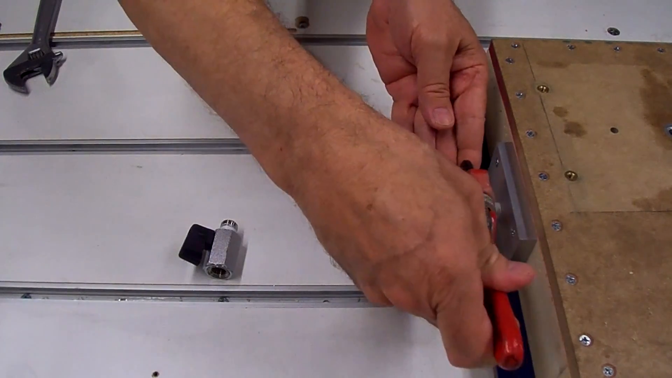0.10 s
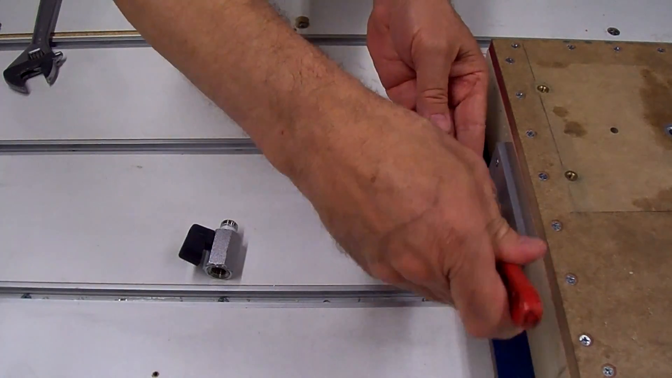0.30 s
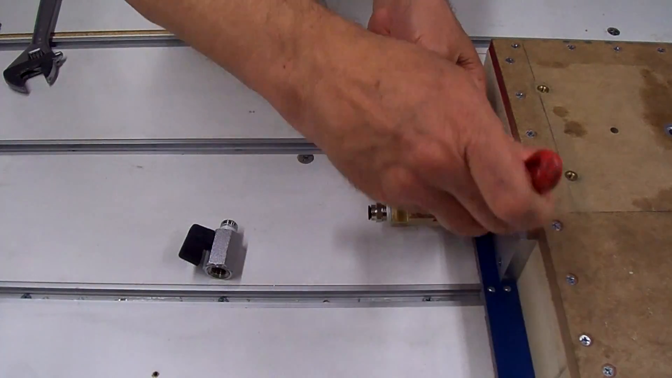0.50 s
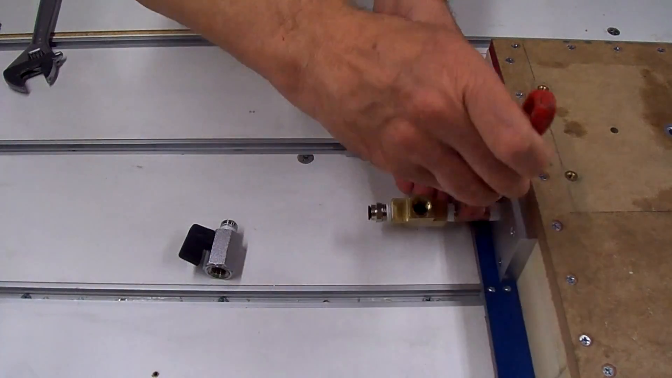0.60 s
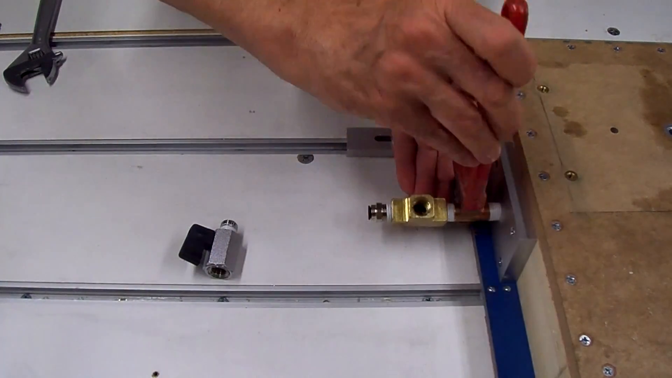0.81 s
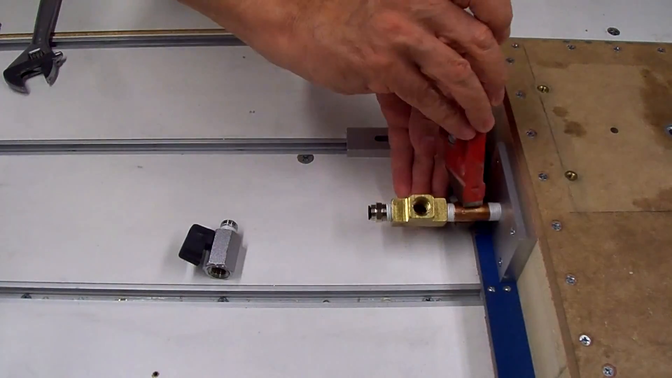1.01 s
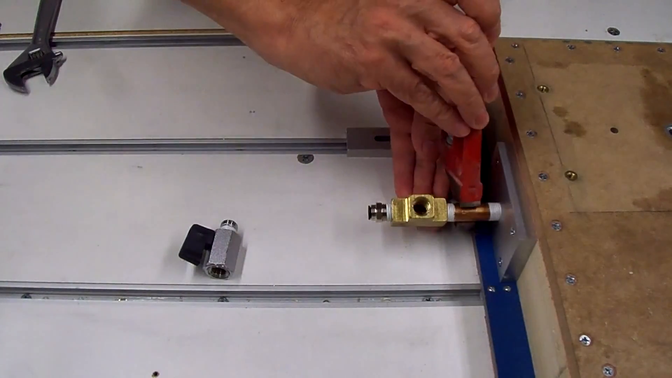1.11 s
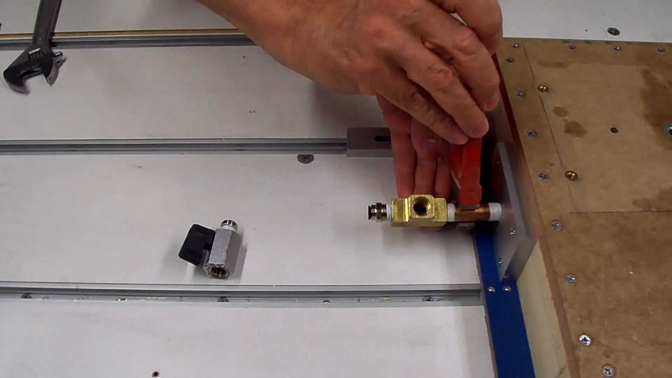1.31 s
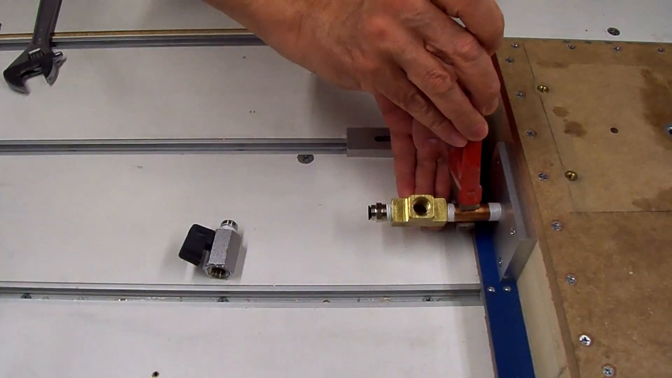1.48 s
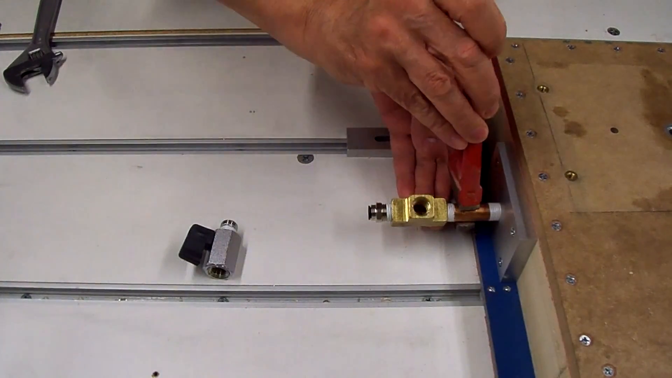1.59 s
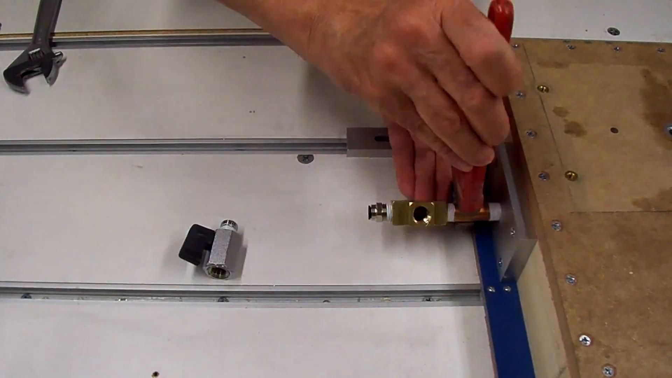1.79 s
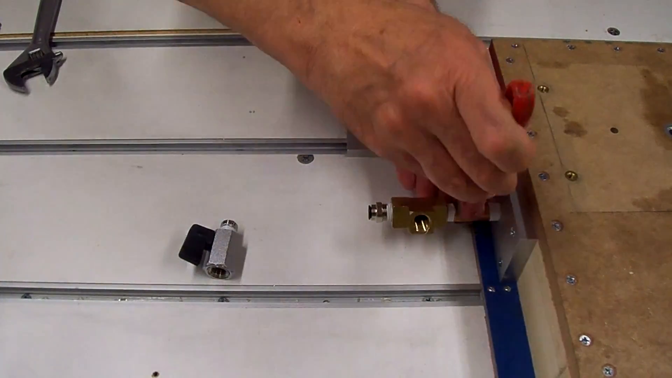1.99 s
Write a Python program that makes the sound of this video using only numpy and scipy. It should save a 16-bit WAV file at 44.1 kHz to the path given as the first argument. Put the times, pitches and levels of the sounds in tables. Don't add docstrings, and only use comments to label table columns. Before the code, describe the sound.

Close up in a quiet room, a hand wrench knocks brass parts with dry, short clinks and woody thuds, shifts softly, clatters again past the middle, then stops, leaving low rumble and hiss.

```python
import sys
import numpy as np
from scipy import signal
from scipy.fft import rfft, irfft, next_fast_len
from scipy.io import wavfile
from scipy.ndimage import map_coordinates

SR = 44100
rng = np.random.default_rng(int(sys.argv[2]) if len(sys.argv) > 2 else 0)


def boost(x):
    u = np.asarray(x, float) / 20
    return 10 ** u


def unload_wav(signal):
    wavfile.write(
        sys.argv[1],
        SR,
        np.round(np.clip(np.atleast_2d(signal).T, -1, 1) * 32767).astype(np.int16),
    )


N = 88200

# (frequency [Hz], level [dB], decay time t60 [s])
STEEL = [(1180, 0, .02), (1430, -2, .05), (1650, 0, .03), (2000, 0, .035), (2190, -2, .03), (2400, 0, .03),
         (2620, 1, .03), (2900, -4, .02), (3230, 0, .025), (3400, -2, .02), (3560, -2, .025),
         (3730, -1, .03), (4040, -2, .03)]
# (frequency [Hz], level [dB], decay time t60 [s])
BOARD = [(119, -12, .15), (167, 2, .33), (213, -6, .15), (244, -4, .14), (282, -5, .12), (327, -1, .12),
         (399, -3, .16), (522, -8, .1), (650, -6, .1), (730, -3, .06), (766, -2, .09), (925, -5, .09),
         (1008, -6, .09), (1093, -7, .07)]
STEEL_LONGEST_S, BOARD_LONGEST_S = .08, .34
STEEL_SCRAPE_DB = 1


def unit(x):
    return x / np.sqrt(np.mean(x ** 2) + 1e-20)


def along(points, hz):
    f, v = np.transpose(points)
    return np.interp(np.log(hz + 1), np.log(f + 1), v)


def filtered(x, response):
    m = next_fast_len(len(x) + 8192)
    hz = np.fft.rfftfreq(m, 1 / SR)
    return irfft(rfft(x, m) * response(hz), m)[:len(x)]


def near(hz, focus_hz, octaves):
    distance = np.log2((hz + 1) / focus_hz)
    return np.exp(-.5 * (distance / octaves) ** 2)


def ringing(modes, focus_hz, octaves, trim_db, longest_s, share=1):
    hz, db, t60 = np.transpose(modes)[:, :, None]
    t = np.arange(round(longest_s * SR)) / SR
    sign = (-1) ** np.arange(len(modes))[:, None]
    fall_db = 60 * t / (share * np.minimum(t60, longest_s))
    level = near(hz, focus_hz, octaves) * boost(db + trim_db[:, None] - fall_db)
    return np.sum(sign * level * np.sin(2 * np.pi * hz * t), axis=0)


def strikes(rows, modes, scrape_db, longest_s, rise_s=.0003, first_blow=1.5):
    scatter_db, dead_share, blow_s = 1.5, .18, .0006
    out = np.zeros(N + SR)
    t = np.arange(4096) / SR
    count = len(modes)
    luck = rng.standard_normal((len(rows), len(t) + count))
    waves = np.exp(2j * np.pi * np.transpose(modes)[0][:, None] * t)
    for (s, db, length, focus_hz, octaves), row in zip(rows, luck):
        envelope = np.exp(-t / length) + first_blow * np.exp(-t / blow_s)
        force = row[count:] * envelope * (1 - np.exp(-t / rise_s))
        trim_db = scatter_db * row[:count]
        drive = np.abs(waves @ force) / np.linalg.norm(force)
        even_db = -20 * np.log10(drive + .3)
        free = ringing(modes, focus_hz, octaves, trim_db + even_db, longest_s)
        gripped = ringing(modes, focus_hz, octaves, trim_db + even_db / 2, longest_s, dead_share)
        rung = signal.fftconvolve(force, free)
        dead = signal.fftconvolve(force, gripped)
        contact = rung / np.abs(rung).max() + boost(scrape_db) * dead / np.abs(dead).max()
        out[round(s * SR):][:len(rung)] += boost(db + 6) * contact
    return out[:N]


def air():
    # (frequency [Hz], level per Hz [dB])
    spectrum = [(12, -28), (20, 1.5), (125, -4.5), (160, -11.5), (194, -7.5), (234, -9.5), (518, -13),
                (611, -17.5), (13800, -32)]
    level_db, low_hz, top_hz = -42.5, 15, 14150
    noise = filtered(rng.standard_normal(N),
                     lambda hz: boost(along(spectrum, hz)) * (hz < top_hz) * (hz > low_hz))
    return boost(level_db) * unit(noise)


def room(x):
    # (frequency [Hz], decay time t60 [s])
    decay = [(200, 0.4), (1000, 0.3), (4000, 0.16), (12000, 0.22)]
    # (frequency [Hz], level [dB])
    send = [(150, -14), (400, -6), (700, 1), (1500, 2), (3500, -3), (6000, -5), (12000, -5)]
    level_db, delay_s, span_s = -7, .004, .25
    span, out = round(span_s * SR), np.zeros(N + SR)
    for start in range(0, N, span):
        hz, t, z = signal.stft(rng.standard_normal(SR // 2), SR, nperseg=256)
        fall = boost(-60 * t / along(decay, hz)[:, None])
        tail = signal.istft(z * fall, SR, nperseg=256)[1]
        wet = signal.fftconvolve(x[start:start + span], tail / np.linalg.norm(tail))
        out[start + round(delay_s * SR):][:len(wet)] += wet
    return boost(level_db) * filtered(out[:N], lambda hz: boost(along(send, hz)))


def hands():
    # (time [s], level [dB])
    pressure = [(0, -44), (.15, -39.5), (.3, -32), (.45, -38), (.56, -36.5), (.74, -39), (.82, -42),
                (.97, -41.5), (1.12, -41), (1.3, -41), (1.45, -46.5), (1.7, -61.5), (2, -70)]
    trim_db, flutter_db, flutter_hz, rub_db = -2, 3, 35, -14
    s, db = np.transpose(pressure)
    t = np.arange(N) / SR
    flutter = map_coordinates(rng.standard_normal(80), [t * flutter_hz])
    force = rng.standard_normal((2, N)) * boost(flutter_db * flutter)
    board_response = ringing(BOARD, 260, 1.0, np.zeros(len(BOARD)), BOARD_LONGEST_S)
    rub_response = ringing(STEEL, 940, 0.52, np.zeros(len(STEEL)), STEEL_LONGEST_S, 0.043)
    board = signal.fftconvolve(force[0], board_response)[:N]
    rub = signal.fftconvolve(force[1], rub_response)[:N]
    return boost(np.interp(t, s, db) + trim_db) * (unit(board) + boost(rub_db) * unit(rub))


def bench():
    # (time [s], level [dB], contact length [s], focus [Hz], spread [octaves])
    thuds = [(.166, -44, 0.0032, 302, 0.34), (.2055, -25.5, 0.0074, 732, 0.23),
             (.2045, -28.5, 0.00081, 179, 0.25), (.2055, -22.5, 0.0056, 318, 0.28),
             (.207, -29.5, 0.012, 1000, .3), (.347, -33.5, 0.0058, 930, 0.36),
             (.35, -33, 0.0043, 330, 0.65), (.354, -33.5, 0.0024, 168, 0.19),
             (.372, -39.5, .004, 167, 0.11), (.492, -37.5, 0.018, 234, .6), (.5, -41.5, 0.0045, 925, 0.18),
             (.51, -38, 0.006, 167, 0.14), (.58, -45, 0.013, 255, 0.53), (.611, -34, 0.0035, 627, 0.77),
             (.612, -31, 0.019, 198, 0.37), (.622, -45, 0.011, 1035, 0.073), (.632, -42, 0.0047, 162, 0.12),
             (.652, -39.5, 0.0052, 630, 0.22), (.662, -45.5, 0.0054, 1020, 0.22),
             (.765, -38, 0.0042, 211, 0.35), (.79, -37.5, 0.009, 245, 0.48), (.865, -32, 0.002, 192, 0.6),
             (.868, -47.5, 0.018, 650, 0.5), (.93, -41, 0.017, 394, 0.41), (1.0, -42.5, 0.0055, 170, 0.45),
             (1.037, -35, 0.0019, 273, 0.65), (1.158, -35, 0.0085, 282, 0.76),
             (1.1915, -24, 0.0053, 322, 0.65), (1.1935, -36, 0.0047, 980, 0.54),
             (1.206, -26, 0.0054, 264, 0.35), (1.226, -30.5, 0.0085, 377, 0.54),
             (1.228, -30.5, 0.0028, 980, 0.77), (1.25, -35, .006, 403, 0.24),
             (1.327, -37.5, 0.002, 350, 0.77), (1.351, -37, 0.0068, 350, 0.77),
             (1.665, -45, 0.0052, 163, 0.17), (1.8, -42.5, 0.0063, 174, 0.42)]
    low_hz, scrape_db = 120, -4
    pushed = strikes(thuds, BOARD, scrape_db, BOARD_LONGEST_S)
    return signal.sosfilt(signal.butter(4, low_hz, "high", fs=SR, output="sos"), pushed)


def brass_parts():
    # (time [s], level [dB], contact length [s], focus [Hz], spread [octaves])
    clinks = [(.178, -54, 0.05, 11900, .015), (.2055, -25, 0.0011, 12400, 0.11),
              (.2057, -28.5, 0.0015, 10300, 0.13), (.2058, -28.5, 0.0015, 4900, 0.3),
              (.206, -46, 0.0026, 6900, 0.41), (.3458, -44, 0.0061, 11000, 0.29),
              (.346, -46, 0.0025, 5540, 0.17), (.3465, -46, 0.0034, 7900, 0.11),
              (.6105, -50.5, 0.0063, 11300, 0.42), (.655, -53, .003, 13900, .05),
              (.683, -60, .002, 11900, .05), (.768, -51, .0024, 12000, .3),
              (1.0371, -33, 0.00079, 11350, 0.13), (1.0373, -45, 0.0011, 9350, 0.26),
              (1.1594, -47.5, 0.0053, 8640, 0.13), (1.178, -49, 0.013, 12000, 0.084),
              (1.1925, -47, 0.0028, 11500, 0.37), (1.3515, -42.5, 0.0019, 4800, .08),
              (1.194, -49, 0.0039, 6050, .06)]
    # (frequency [Hz], level [dB], decay time t60 [s])
    brass = [(4880, 4, .015), (5400, -3, .025), (6050, -2, .025), (7400, -1, .02), (7950, -3, .03),
             (8600, -3, .02), (9300, 1, .018), (10500, -3, .03), (11170, -6, .07), (11900, -3, .03),
             (12500, -10, .1), (12650, 2, .018), (13200, -4, .025), (13900, -8, .04)]
    scrape_db, longest_s = 3, .11
    return strikes(clinks, brass, scrape_db, longest_s)


def wrench_jaw():
    # (time [s], level [dB], contact length [s], focus [Hz], spread [octaves])
    knocks = [(.169, -35, 0.0069, 3400, .35), (.1695, -40, 0.0064, 1440, 0.27),
              (.2055, -25.5, 0.012, 1440, 0.31), (.206, -20.5, 0.0018, 3210, 0.22),
              (.2065, -25, 0.0043, 2316, 0.15), (.212, -36.5, 0.013, 3800, 0.15),
              (.3455, -34, .0035, 2410, 0.13), (.346, -41.5, 0.005, 3530, 0.082),
              (.352, -38, 0.004, 1990, 0.31), (.356, -54.5, 0.0047, 3430, 0.11),
              (.501, -49, 0.0034, 3280, .12), (.5065, -40.5, 0.007, 2350, 0.13),
              (.5815, -47.5, 0.0021, 3570, 0.16), (.583, -41.5, 0.0027, 1260, 0.22),
              (.6105, -32.5, 0.0019, 2570, 0.31), (.611, -38.5, 0.002, 3420, .15),
              (.619, -38.5, 0.0081, 2390, 0.16), (.641, -46.5, 0.006, 2230, 0.11),
              (.642, -47.5, 0.0044, 3520, 0.11), (.655, -47.5, 0.0048, 3450, 0.088),
              (.866, -54, .004, 3370, 0.11), (.881, -50, 0.0015, 1450, 0.13),
              (.882, -52, 0.0016, 3300, 0.25), (1.0375, -40, 0.0035, 1620, 0.4),
              (1.0378, -38.5, 0.0033, 3660, 0.31), (1.109, -56, 0.0023, 3350, 0.12),
              (1.16, -41.5, .0025, 3400, 0.072), (1.193, -23.5, 0.0018, 2800, 0.33),
              (1.1935, -33.5, 0.0044, 1730, 0.3), (1.204, -41, 0.0063, 2380, 0.37),
              (1.225, -32.5, 0.0029, 3620, 0.31), (1.2255, -30.5, 0.006, 2350, 0.42),
              (1.227, -37.5, 0.0034, 1450, 0.4), (1.243, -58, 0.0043, 2500, .4),
              (1.316, -43.5, 0.0018, 3500, 0.05), (1.3265, -34.5, 0.001, 2870, 0.22),
              (1.327, -33.5, 0.0012, 1460, 0.21), (1.338, -41.5, 0.0031, 1540, 0.16),
              (1.3505, -37.5, 0.0021, 1550, 0.42), (1.3505, -29.5, 0.0012, 3080, 0.14)]
    # (time [s], level [dB], contact length [s], focus [Hz], spread [octaves])
    slides = [
        (.185, -35.5, 0.0067, 3240, 0.24),
        (.186, -61, 0.0039, 2370, 0.11),
        (.915, -56, .008, 3250, 0.065),
        (1.168, -44, 0.014, 2500, 0.65),
        (1.16, -48, 0.0096, 1200, 0.34),
        (1.362, -64, 0.0042, 1620, 0.42),
    ]
    top_hz, slide_rise_s = 4250, .012
    knocked = strikes(knocks, STEEL, STEEL_SCRAPE_DB, STEEL_LONGEST_S)
    slid = strikes(slides, STEEL, STEEL_SCRAPE_DB, STEEL_LONGEST_S, slide_rise_s, first_blow=0)
    return signal.sosfilt(signal.butter(8, top_hz, fs=SR, output="sos"), knocked + slid)


def scene():
    hits = wrench_jaw() + bench() + brass_parts()
    return (hits + room(hits) + hands() + air())[None]


def low_pass(x):
    return signal.sosfilt(signal.butter(12, 15320, fs=SR, output="sos"), x)


def record(dry):
    ceiling, knee = .7, 4
    top_hz, top_order = 14300, 60
    rounded = dry[0] / (1 + np.abs(dry[0] / ceiling) ** knee) ** (1 / knee)
    limited = filtered(rounded, lambda hz: 1 / np.sqrt(1 + (hz / top_hz) ** top_order))
    return low_pass(limited[None])


dry = scene()
out = record(dry)
unload_wav(out)
```